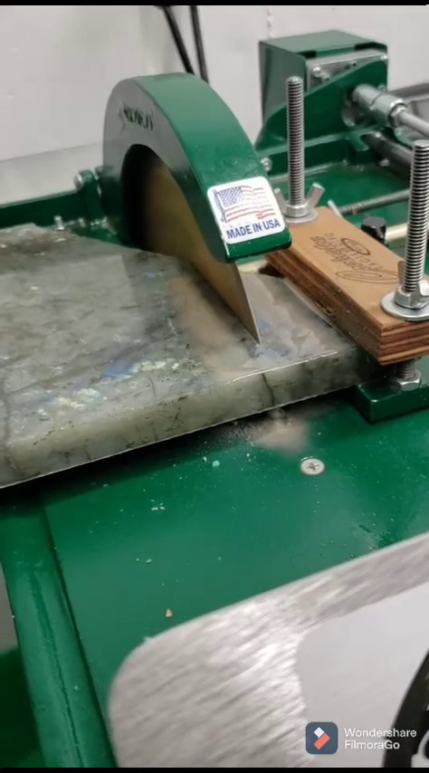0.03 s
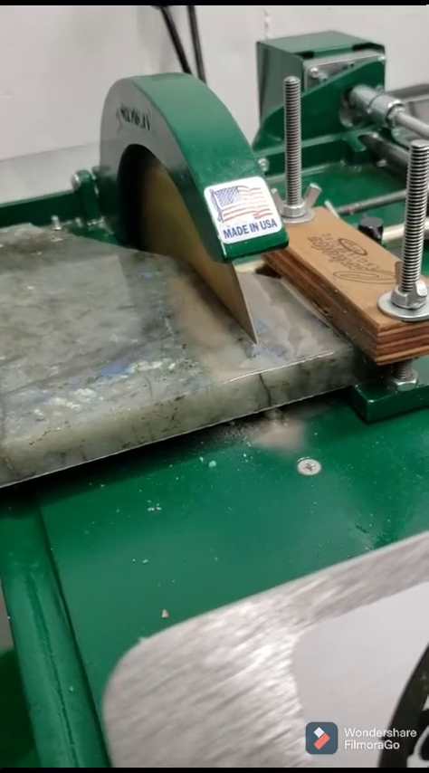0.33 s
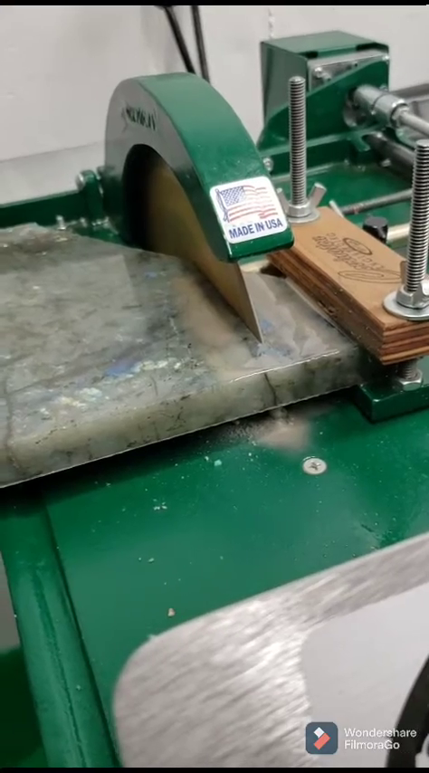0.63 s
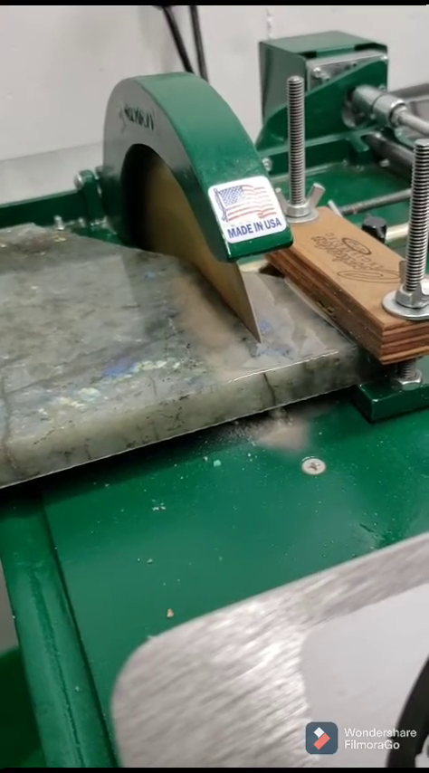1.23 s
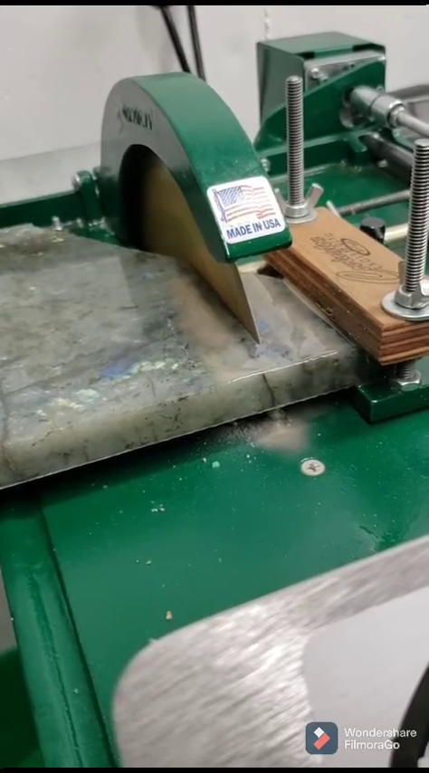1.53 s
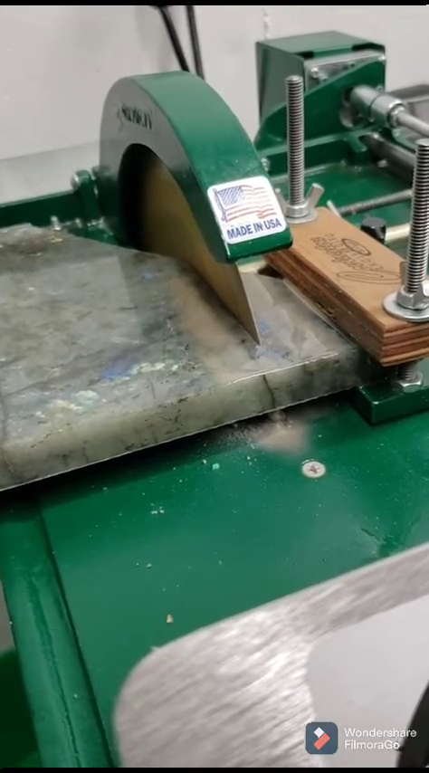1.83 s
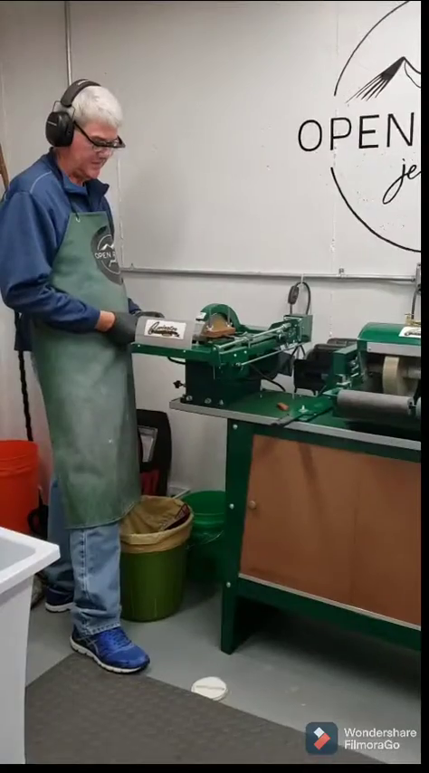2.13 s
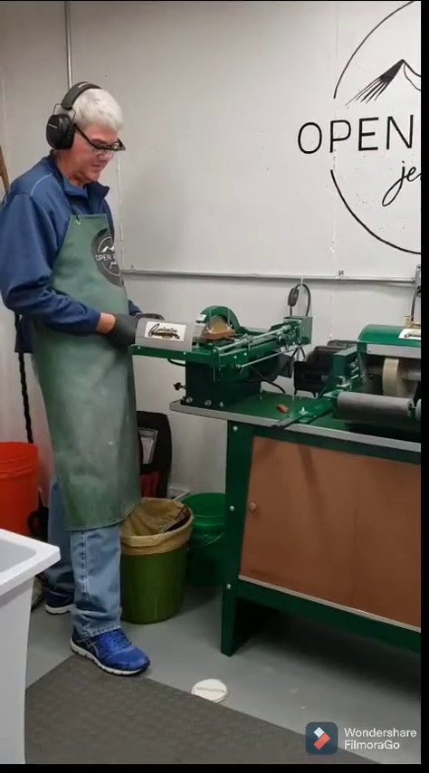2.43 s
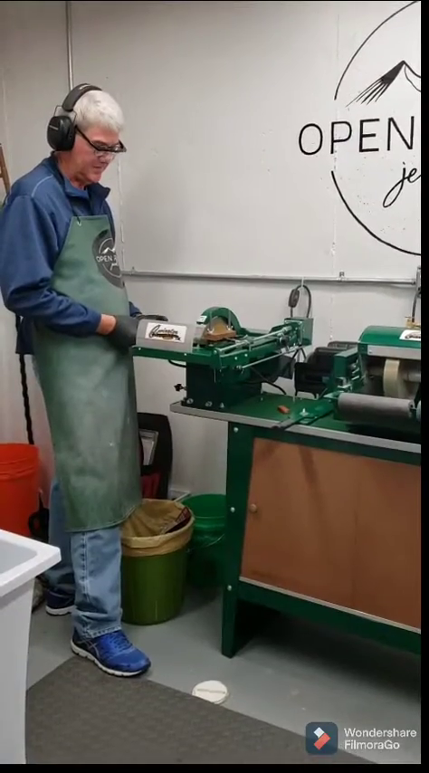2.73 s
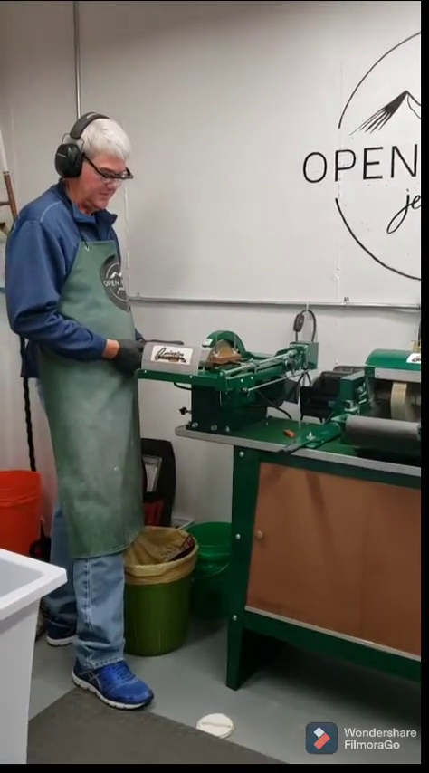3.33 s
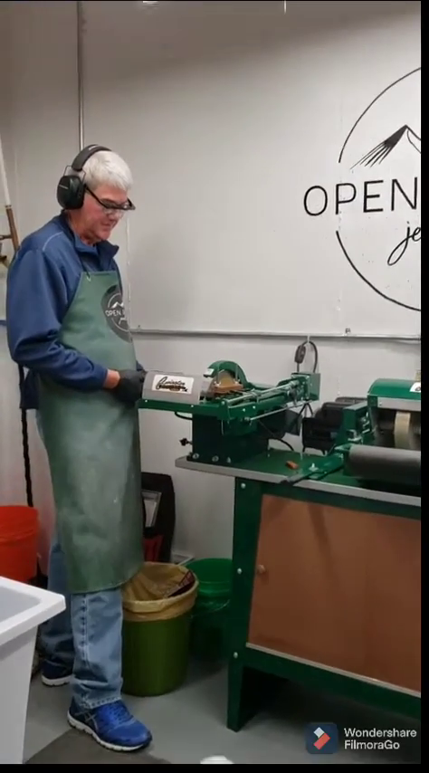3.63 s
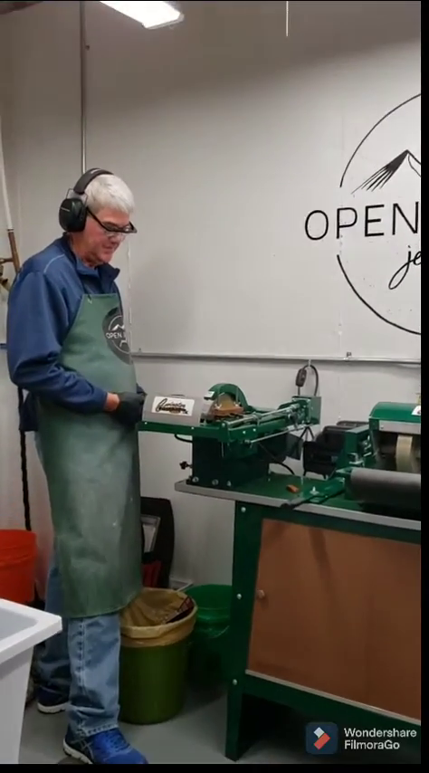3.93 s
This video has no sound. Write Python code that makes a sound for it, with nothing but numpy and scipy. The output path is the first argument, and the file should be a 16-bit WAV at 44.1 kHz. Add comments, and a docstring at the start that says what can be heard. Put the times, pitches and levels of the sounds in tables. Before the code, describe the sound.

A slab saw grinds through stone close by, a gritty rasp with ringing steel over a drone and motor hum. A low boom swells from about 0.2 to 0.6 seconds, a dull bump comes near 0.9, and the blade catches briefly several times. At 2 seconds the sound drops out for an instant, then continues from across the workshop with a stronger hum, rising and falling until about 4 seconds.

```python
"""A slab saw grinds through stone in a workshop, heard beside the blade, then, after a brief
silence, from across the room. Diamond grit rasps in the kerf and forces the steel blade and
housing into resonance; the load rises and falls, and the blade catches now and then.
Beneath it the arbor drones at multiples of its rotation rate, the motor hums and the
carriage gives a few dull bumps."""
import sys
import numpy as np
from scipy import signal
from scipy.fft import rfft, irfft, next_fast_len
from scipy.io import wavfile
from scipy.ndimage import map_coordinates

SR = 44100
rng = np.random.default_rng(int(sys.argv[2]) if len(sys.argv) > 2 else 0)


def waveform_to_disk(signal):
    """Save audio, clipped to [-1, 1], as 16-bit WAV at the path in sys.argv[1]."""
    frames = np.transpose(np.atleast_2d(signal))
    scaled = np.clip(frames, -1, 1) * 32767
    samples = np.round(scaled).astype(np.int16)
    wavfile.write(sys.argv[1], SR, samples)


N = 176400

# Cutting load at each position: t/s, treble rasp level/dB, lower rubbing level/dB
CLOSE_LOAD = [(0.1, 1.4, 0.4), (0.17, 4.5, 3), (0.2, 1, 2), (0.28, 5, 3), (0.37, 0.5, 0.8),
              (0.49, 3.5, 1.2), (0.53, -2, -1), (0.56, 3.5, 2), (0.7, -5, -1), (0.77, -6.3, -7),
              (0.82, -3.5, -4.5), (0.88, 1, 2), (0.98, -0.5, -1.5), (1.01, -3, -3), (1.08, 0.5, -1.7),
              (1.19, -5.5, -2), (1.22, -8.5, -5), (1.32, -2.6, -0.4), (1.41, -8, -4), (1.49, -2, -2),
              (1.51, -6, -3.5), (1.579, -3.5, -5.5), (1.66, -2.8, -0.2), (1.71, -5, -3.5),
              (1.85, -1.5, -.5), (1.98, -7, -10)]
FAR_LOAD = [(2.04, -1, 1), (2.07, 5, 5), (2.14, 0.2, 1), (2.29, 1.6, 2), (2.429, -6.5, -4), (2.53, 0, 1.1),
            (2.71, 2.5, 1), (2.78, 0.5, 1.8), (2.83, 3, 4.5), (2.88, 1.5, 1.5), (3.03, 3.5, 2.1),
            (3.21, 1.5, 1.1), (3.34, 3.5, 1.3), (3.47, -2, -4), (3.64, 1, 0), (3.9, -5.5, -3),
            (3.98, -6, -5)]
# Noise spectrum of the cut: f/Hz, close density level/dB, far density level/dB
KERF_SPECTRUM = [(20.0, -100, -98.5), (70.0, -71, -79), (175.0, -71.5, -78), (435, -76.5, -73.5),
                 (610, -73.5, -69), (850.0, -79.5, -77.5), (1144, -71.5, -71.0), (1470, -63.5, -59.5),
                 (1820, -70, -69.0), (2050.0, -62.5, -62.0), (2280, -72, -76), (2790, -64, -64.5),
                 (3230, -68.5, -68), (3700, -94, -79), (4280.0, -83, -77.5), (4640, -63.5, -67),
                 (5230, -72.5, -69.5), (6680, -75, -78.5), (7020, -66.5, -66), (8870, -70.0, -71.5),
                 (12560, -61, -65.5), (15700.0, -68, -66.5)]
# Modes of blade and housing: f/Hz, close level/dB, far level/dB
STEEL_MODES = [(228.4, -47, -46), (479, -49.5, -52), (541.7, -44.5, -60), (650.0, -52, -52),
               (710.7, -48.5, -43.5), (768, -61.0, -53), (969.3, -49, -47.5), (1283.0, -41.5, -36.5),
               (1425.5, -38.5, -31), (1449.0, -44.5, -37.5), (1517, -41, -50.0), (1540, -64, -44.5),
               (1667, -42.5, -39.5), (1985, -45, -42.5), (2083.5, -36.5, -33), (2384, -52.5, -41.5),
               (2416, -39.5, -39.5), (2530, -45.5, -46.5), (2806.0, -46, -44.5), (2927, -42.5, -42),
               (3020, -41.5, -46), (3160, -54, -51), (3407, -51.5, -41.5), (3455, -43.5, -44.0),
               (3563, -45, -40.5), (3882, -45.0, -48.5), (3990, -53.5, -53.5), (4079, -45, -39.5),
               (4450, -41.5, -44), (4734, -38, -46), (5034.0, -58.5, -47), (5350, -45, -47.5),
               (5396, -41.5, -43), (5967.0, -46, -43.5), (6140, -43, -44.5), (6397.0, -51, -46.5),
               (6690, -42.5, -46), (6880, -43, -47), (7435, -41, -58.0), (7550, -39, -43),
               (8062.0, -48.5, -45), (8950, -46, -49), (9435.0, -45.0, -53.5), (9825.0, -43, -60.5),
               (10340, -41, -46.0), (10750, -41, -63.0), (10970, -41, -48), (11400, -53, -51.0),
               (12600, -32.5, -58.0), (13340, -44.5, -40), (14500, -42, -42.5), (15458.0, -33, -43.0)]
# Harmonics of the arbor's rotation: order, close level/dB, far level/dB
ARBOR_ORDERS = [(3, -66, -58), (7, -58, -50), (8, -60, -55), (12, -58, -53), (18, -69, -55), (26, -58, -58),
                (27, -49, -43), (28, -44, -39), (29, -47, -50), (30, -51, -45), (37, -62, -51),
                (38, -59, -50)]
# Partials of the motor's hum: f/Hz, close level/dB, far level/dB
HUM_PARTIALS = [(60, -81, -59), (120.3, -59.5, -42)]
# The blade catches in the stone: t/s, change of rasp level/dB
BLADE_CATCHES = [(.056, 2), (.139, -4), (.251, 3), (0.678, 9), (0.722, 11), (0.809, 7), (.978, 5.5),
                 (1.237, 3), (1.288, 4.5), (1.312, 4), (1.371, 7), (1.422, 6.5), (1.53, 9.5), (1.595, 4)]
# Bumps of the carriage: t/s, level/dB
CARRIAGE_BUMPS = [(0.084, -43), (0.368, -41), (0.864, -25), (.953, -40)]
# Modes struck by a bump: f/Hz, level/dB, 60 dB decay time/s
THUD_MODES = [(79.4, 0, 0.069), (212, -6.5, 0.26)]
# Envelope of the boom as the blade bears down: t/s, level/dB
BOOM_ENVELOPE = [(.12, -57), (.22, -44), (.6, -45), (.72, -67), (1.98, -53)]
# Arbor harmonics that boom: order, relative level/dB
BOOM_HARMONICS = [(7, -0.5), (12, -3.5), (28, 3.5)]
# One mode sings out: peak t/s, half length/s, f/Hz, gain/dB
MODE_SWELLS = [(0.188, 0.024, 227, 13), (0.396, 0.28, 230, 3.5), (1.795, 0.045, 2066, 8.5),
               (2.9, 0.29, 227, 3.5), (3.204, 0.22, 1270, 4.5), (3.35, 0.16, 1440, 1)]
# Excess of left over right: f/Hz, close level/dB, far level/dB
LEFT_LEAN = [(116, -1.5, 4), (244, -2, -1.5), (514, 0, -4), (990, -2.5, -1), (2070, 5.5, 0.5),
             (3840, -1, 1.5), (7300, 4, 3.5), (14900, -1, -3)]
# Likeness of left and right: f/Hz, correlation
CORRELATION = [(120, 0.87), (240, 0.92), (520, 0.61), (900, 0.34), (1400, -0.076), (2500, 0.09),
               (15000, -0.041)]

CLOSE, FAR = 0, 1  # listening positions
TIME = np.arange(N) / SR


def amp(db):
    """Amplitude ratio of a level in decibels."""
    return 10 ** (np.asarray(db) / 20)


def unit(x):
    """Normalisation to an rms of 1."""
    return x / np.sqrt(np.mean(x ** 2) + 1e-20)


def along(points, hz, column):
    """Interpolation of one column of a spectrum on a logarithmic frequency axis."""
    table = np.transpose(points)
    return np.interp(np.log(hz + 1), np.log(table[0] + 1), table[column])


def wobble(rate):
    """Smooth random modulation with `rate` knots a second."""
    return map_coordinates(rng.standard_normal(4096), [TIME * rate], mode="wrap")


def filtered(x, response):
    """Linear filtering: the spectrum of x is multiplied by a frequency response."""
    size = next_fast_len(N + SR // 4)
    return irfft(rfft(x, size) * response(np.fft.rfftfreq(size, 1 / SR)), size)[..., :N]


def grit(impact_share, grains_per_s=5000):
    """Shot noise: tiny impacts of diamond grains add in power to a bed of friction noise."""
    hits = rng.random(N) < grains_per_s / SR
    impacts = unit(hits * rng.standard_normal((2, N)))
    return np.sqrt(impact_share) * impacts + np.sqrt(1 - impact_share) * rng.standard_normal((2, N))


def rim_snatches(per_s=46, fade_s=0.025):
    """A Poisson process: the rim grabs at random, and each sudden rise decays exponentially."""
    grabs = (rng.random(N) < per_s / SR) * rng.random(N)
    swell = signal.lfilter([1], [1, -np.exp(-1 / (fade_s * SR))], grabs)
    return unit(swell - swell.mean())


def kerf_force(load, turns, chatter_db, snatch_db, catch_s=0.0087, runout_db=0.14):
    """Amplitude modulation: load, chatter, catches and runout vary the friction in the kerf."""
    times, rasp_db, rub_db = np.transpose(load)
    chatter = chatter_db * wobble(60) + snatch_db * rim_snatches()
    runout = runout_db * (np.sin(2 * np.pi * turns) + .5 * np.sin(6 * np.pi * turns))
    catches = sum(db * (TIME >= start) * np.exp(-np.abs(TIME - start) / catch_s)
                  for start, db in BLADE_CATCHES)
    rasp = grit(0.53) * amp(np.interp(TIME, times, rasp_db) + chatter + catches)
    rub = grit(0.28) * amp(np.interp(TIME, times, rub_db) + .5 * chatter + runout + 0.19 * catches)
    # Shares of power; the steady part is the machine's own low noise, which ignores the load.
    treble = lambda hz: 1 / (1 + (3400 / (hz + 1)) ** 4)
    steady = lambda hz: 0.31 / (1 + (hz / 930) ** 4)
    force = filtered(rasp, lambda hz: np.sqrt(treble(hz)))
    force += filtered(rub, lambda hz: np.sqrt((1 - treble(hz)) * (1 - steady(hz))))
    return force + filtered(rng.standard_normal((2, N)), lambda hz: np.sqrt(steady(hz)))


def reflections(x, wet, t60=0.038):
    """Scattering: hood and bench return a short, exponentially decaying spray of echoes."""
    t = np.arange(SR // 4) / SR
    tail = rng.standard_normal((2, len(t))) * amp(-60 * t / t60)
    tail /= np.linalg.norm(tail, axis=1, keepdims=True)
    return (x + wet * signal.fftconvolve(x[:1], tail, axes=1)[:, :N]) / np.hypot(1, wet)


def steel_response(hz, place):
    """Modal superposition: blade and housing, damped by stone and coolant, in mid and side."""
    response = np.zeros((2, len(hz)), complex)
    for k, (centre, *levels) in enumerate(STEEL_MODES):
        width_hz = 20 + (centre / 490) ** 1.5  # higher modes die sooner
        peak = amp(levels[place]) * np.sqrt(2 * SR / (np.pi * width_hz))
        mode = peak / (1 + 2j * (hz - centre) / width_hz) ** 2
        response[0] += mode
        # Quadrature: equally loud left and right; the alternating phase lead widens the ring.
        response[1] += 1j * (-1) ** k * mode
    return response


def cutting(place, force, hiss_db, ring_db, wet, diffuse_share=.55):
    """Forced vibration: one friction force radiates as broad hiss and rings the steel."""
    spectrum = lambda hz: amp(along(KERF_SPECTRUM, hz, 1 + place)) * np.sqrt(SR / 2)
    hiss = filtered(reflections(force, wet), spectrum)
    scattered = np.sqrt(1 - diffuse_share) * force[1] + np.sqrt(diffuse_share) * force[0]
    ring = filtered(np.array([force[1], scattered]), lambda hz: steel_response(hz, place))
    return amp(hiss_db) * hiss + amp(ring_db) * singing_modes(ring)


def arbor_drone(place, load, turns, waver_db, side_db, slip_rad=.011):
    """Rotational harmonics: belt slip modulates their phase, so high orders flutter most."""
    times, _, rub_db = np.transpose(load)
    drone = np.zeros((2, N))
    for order, *levels in ARBOR_ORDERS:
        phase = 2 * np.pi * (order * turns + rng.random()) + slip_rad * order * wobble(25)
        gain = amp(levels[place] + waver_db * wobble(22.1))
        drone += gain * np.array([np.sin(phase), amp(side_db) * np.cos(phase)])
    return np.sqrt(2) * drone * amp(.7 * np.interp(TIME, times, rub_db))  # swells with the load


def motor_hum(place):
    """Periodic vibration: the motor gives two partials of steady pitch and wavering level."""
    return np.sqrt(2) * sum(amp(levels[place] + 2.16 * wobble(20)) * np.sin(2 * np.pi * hz * TIME)
                            for hz, *levels in HUM_PARTIALS)


def carriage_bumps(highpass_hz=35):
    """Damped free vibration: the carriage knocks softly against the bench."""
    track, t = np.zeros(N + SR), np.arange(SR // 3) / SR
    thud = sum(amp(db - 60 * t / t60) * np.sin(2 * np.pi * hz * t) for hz, db, t60 in THUD_MODES)
    for start, db in CARRIAGE_BUMPS:
        track[round(start * SR):][:len(t)] -= amp(db) * thud
    return filtered(track[:N], lambda hz: (1j * hz / (highpass_hz + 1j * hz)) ** 2)


def arbor_boom(turns):
    """Forced vibration: a few arbor orders swell and flutter under the heavy first part of the cut."""
    envelope_db = np.interp(TIME, *np.transpose(BOOM_ENVELOPE))
    boom = np.zeros(N)
    for order, db in BOOM_HARMONICS:
        gain = amp(envelope_db + db + 0.99 * wobble(15))
        boom += gain * np.sin(2 * np.pi * order * turns + order / 20 * wobble(20))
    return np.sqrt(2) * boom


def singing_modes(ring, width_hz=27):
    """Selective excitation: as the contact shifts along the rim, single modes swell above the rest."""
    swells = np.zeros_like(ring)
    for peak_s, half_s, centre, db in MODE_SWELLS:
        band = filtered(ring, lambda hz: np.exp(-((hz - centre) / width_hz) ** 2))
        swells += (amp(db) - 1) * np.exp(-((TIME - peak_s) / half_s) ** 2) * band
    return ring + swells


def spread(pair, place):
    """Interaural coherence: mid and side give left and right, alike in the bass, diffuse in the treble."""
    angle = lambda hz: np.arccos(along(CORRELATION, hz, 1)) / 2
    mid, side = filtered(pair, lambda hz: np.array([np.cos(angle(hz)), np.sin(angle(hz))]))
    balance = lambda hz: amp(np.outer([.5, -.5], along(LEFT_LEAN, hz, 1 + place)))
    return filtered(np.array([mid + side, mid - side]), balance)


def scene():
    """Superposition of the saw's sources: close by, then, after a silence, from across the room."""
    spin_hz, relative_drift = 18.91, 0.00088
    turns = np.cumsum(spin_hz * (1 + relative_drift * wobble(2.93))) / SR

    force = kerf_force(CLOSE_LOAD, turns, chatter_db=1.08, snatch_db=1.01)
    close = cutting(CLOSE, force, hiss_db=0, ring_db=-0.62, wet=0.73)
    close += arbor_drone(CLOSE, CLOSE_LOAD, turns, waver_db=1.5, side_db=-1)
    close[0] += motor_hum(CLOSE)  # mid only

    force = kerf_force(FAR_LOAD, turns, chatter_db=.5, snatch_db=0.67)
    far = cutting(FAR, force, hiss_db=-0.27, ring_db=-0.5, wet=0.74)
    far += arbor_drone(FAR, FAR_LOAD, turns, waver_db=2.75, side_db=-2)
    far[0] += motor_hum(FAR)

    close_end_s, far_start_s, fade_s = 1.992, 2.026, .002
    fade_out = np.exp(-np.maximum(TIME - close_end_s, 0) / fade_s)
    fade_in = np.clip((TIME - far_start_s) / fade_s + 1, 0, 1)
    beside_blade = spread(close, CLOSE) + arbor_boom(turns) + carriage_bumps()
    return beside_blade * fade_out + spread(far, FAR) * fade_in


def record(dry):
    """Band limiting: a steep low-pass filter removes the highest treble."""
    cutoff_hz = 15780
    return filtered(dry, lambda hz: 1 / (1 + (hz / cutoff_hz) ** 400))


dry = scene()
out = record(dry)
waveform_to_disk(out)
```